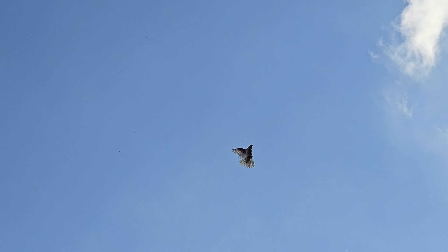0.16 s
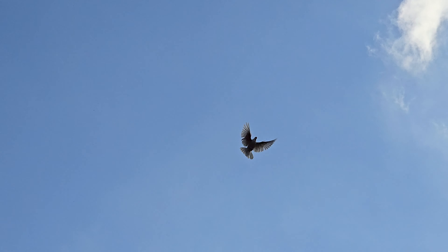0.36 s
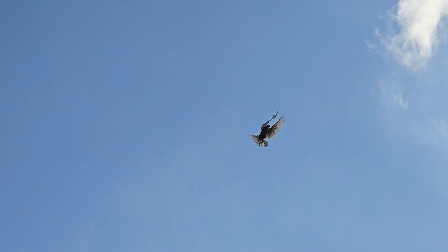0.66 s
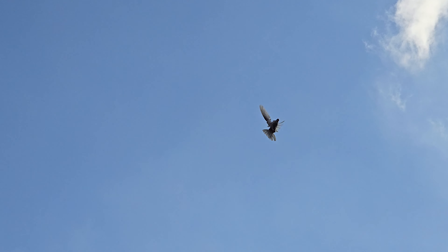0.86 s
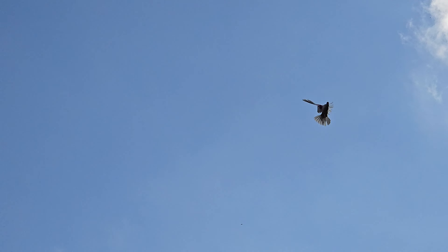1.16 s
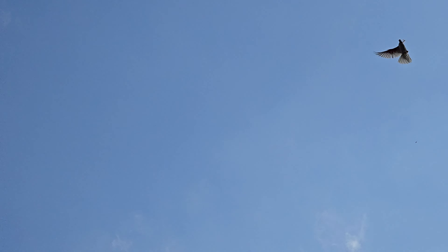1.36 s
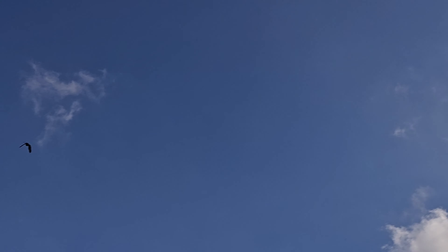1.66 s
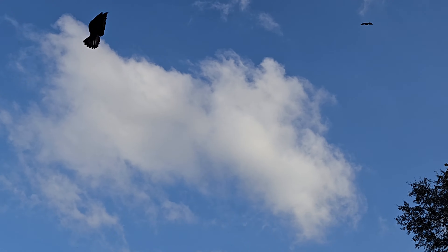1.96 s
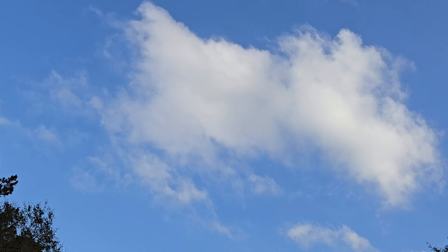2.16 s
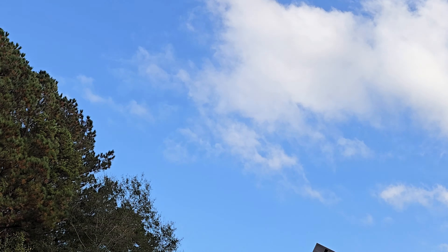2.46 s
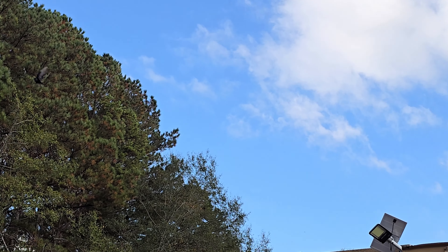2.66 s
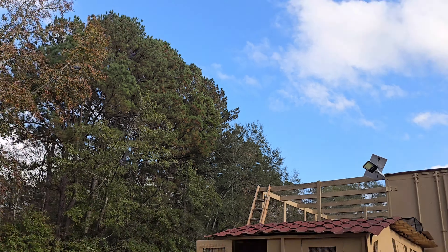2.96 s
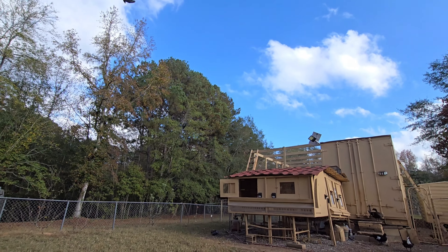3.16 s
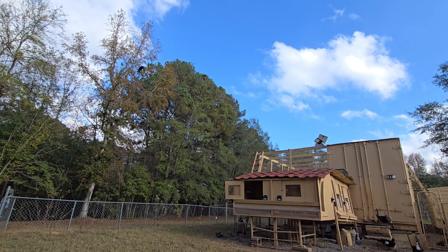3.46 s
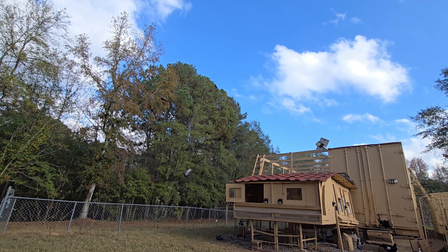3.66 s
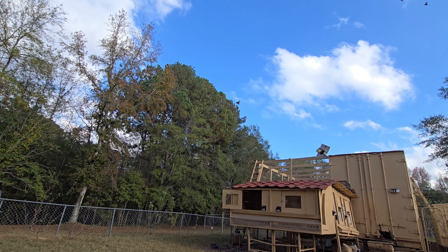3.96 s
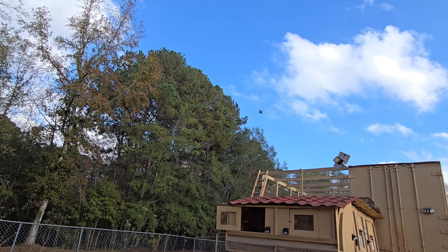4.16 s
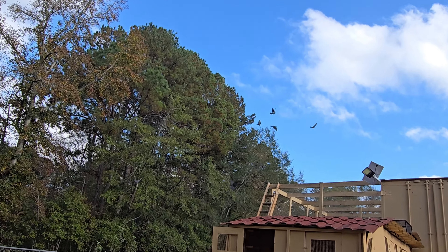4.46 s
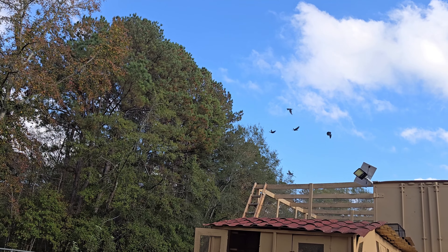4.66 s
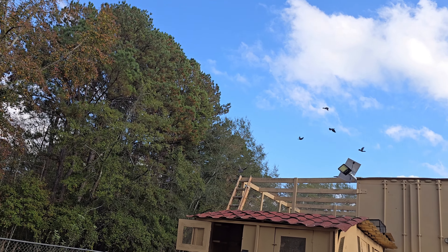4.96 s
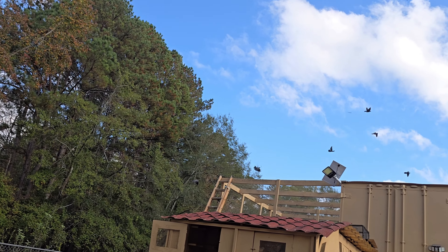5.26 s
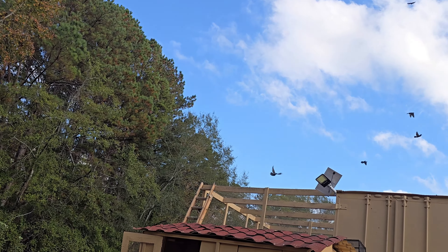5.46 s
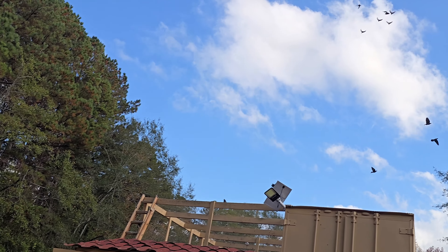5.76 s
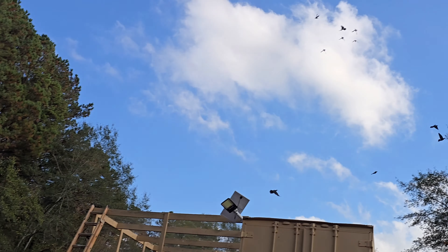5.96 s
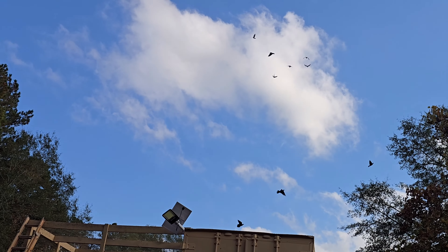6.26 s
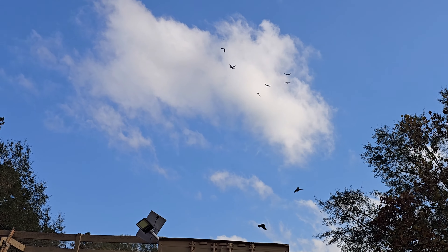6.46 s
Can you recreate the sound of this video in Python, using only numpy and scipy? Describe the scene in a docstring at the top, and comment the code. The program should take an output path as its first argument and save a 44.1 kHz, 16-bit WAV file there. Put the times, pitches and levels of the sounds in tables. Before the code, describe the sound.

Crisp pigeon wing claps outdoors, first single, then a dense close flurry with slapback off a shed wall, thinning into light wind.

```python
"""Pigeons fly over a yard, near a hand-held camera that turns to follow them.
From the start, shaped noise gives light wind, a low roar, feather swish, hiss, a trilling insect and a dragging hand.
Wing claps soon follow: bursts of feather snaps with resonant rings, echoed by the ground and the yard.
Knocks ring the camera body early and again near 1.5 s; then low thuds and a whoosh mark near wings.
Later the shed wall throws the claps back strongly; two ports colour and delay the sound differently."""
import sys
import numpy as np
from scipy import signal
from scipy.fft import rfft, irfft
from scipy.io import wavfile
from scipy.ndimage import uniform_filter1d

SR = 44100
rng = np.random.default_rng(int(sys.argv[2]) if len(sys.argv) > 2 else 0)


def inscribe(sig):
    """Save sig as 16-bit PCM at rate SR to the path in sys.argv[1].

    A 1-D sig is mono; a 2-D sig holds one channel per row.
    Samples are clipped to [-1, 1] before scaling.
    """
    pcm = np.round(np.clip(np.atleast_2d(sig).T, -1, 1) * 32767)
    wavfile.write(sys.argv[1], SR, pcm.astype(np.int16))


N = 291501

# Orientation of the camera to the birds: (time [s], lateness of a clap at the right port [ms],
# gain of quill and cavity rings [dB], left-right level difference of the birds [dB])
FACING = [(0, 0.59, -29, 2), (1.401, 0.53, 0.5, 3.5), (1.9, 0.47, 7.5, 4.5), (2.3, 0.11, 5.5, 0),
          (3.5, 0.12, 8, 4), (5, 0.1, 7.5, 2.5), (5.6, 0.19, 8, 2), (6.61, 0.13, 8.5, 4.5)]
# Swish of feathers through air: (time [s], level [dB])
SWISH_LEVEL = [(0, -52), (1.5, -48.5), (1.66, -55), (1.9, -42.5), (2.65, -50.5), (3.1, -46.5), (3.3, -49.5),
               (4.1, -48), (4.4, -50.5), (5.0, -55), (5.5, -57), (5.7, -61)]


def gain_of(db):
    """Level to amplitude: 20 dB is a factor of ten."""
    return 10 ** (np.asarray(db) / 20)


def evened(x):
    """Normalization of the mean power: rms 1."""
    return x / np.sqrt(np.mean(x ** 2) + 1e-20)


def read(points, hz):
    """Spectral interpolation along a logarithmic frequency axis."""
    f, value = np.transpose(points)
    return np.interp(np.log(hz + 1), np.log(f + 1), value)


def track(points, s):
    """Linear interpolation of (time, value) rows at the times s."""
    return np.interp(s, *np.transpose(points))


def add(mix, s, sound):
    """Superposition: adds a sound to one channel, in place, from time s."""
    part = mix[round(s * SR):][:len(sound)]
    part += sound[:len(part)]


def coloured(x, points):
    """Spectral shaping: multiplies the spectrum of noise by a gain curve, then sets rms 1."""
    hz = np.fft.rfftfreq(x.shape[-1], 1 / SR)
    shaped = rfft(x) * gain_of(read(points, hz))
    return evened(irfft(shaped, x.shape[-1]))


def causal(points):
    """Minimum phase: the Hilbert transform of log gain gives the phase of a causal response."""
    hz = abs(np.fft.fftfreq(4096, 1 / SR))
    log_gain = np.log(gain_of(read(points, hz)))
    return np.fft.ifft(np.exp(np.conj(signal.hilbert(log_gain)))).real[:1024]


def sides(pan_db):
    """Interchannel level difference, split evenly between left and right gains."""
    return gain_of([pan_db / 2, -pan_db / 2])


def rung(x, hz, sharpness):
    """Resonance: a second-order peak driven by x, given the energy of x."""
    ring = signal.lfilter(*signal.iirpeak(hz, sharpness, SR), x)
    return ring * np.linalg.norm(x) / np.linalg.norm(ring)


def slide():
    """Stick-slip friction: skin drags over the shell as grainy noise; a nail adds fine grit."""
    # Drags of the hand: (start [s], length [s], left level [dB], right level [dB], grit relative to rub [dB])
    drags = [(0, 0.062, -53, -53, -6), (0.294, 0.12, -47.5, -48, -12), (0.361, .011, -38.5, -43, -18),
             (1.508, 0.08, -40, -39.5, -11.5), (1.541, 0.019, -30.5, -33.5, 1.5)]
    # Spectrum of the rub: (frequency [Hz], relative density [dB per Hz])
    rub_colour = [(300, 5.5), (1000, 10), (2200, -2.5), (4000, -24), (8000, -9), (9000, -7), (16000, -4)]
    # Spectrum of the fine grit: (frequency [Hz], relative density [dB per Hz])
    grit_colour = [(1500, -1), (3600, -1), (7000, -6), (9000, -23)]
    grip_share, let_go_share = 0.38, 0.22  # of the length: to swell before and fade after, by 20 dB
    t = np.arange(2 * SR) / SR
    roughness = evened(uniform_filter1d(rng.standard_normal(len(t)), size=40))
    grain = gain_of(2.5 * roughness)
    rub = evened(coloured(rng.standard_normal((2, len(t))), rub_colour) * grain)
    grit = evened(coloured(rng.standard_normal((2, len(t))), grit_colour) * grain)
    out = np.zeros((2, len(t)))
    for s, length, left_db, right_db, grit_db in drags:
        before, after = (s - t) / grip_share, (t - s - length) / let_go_share
        away = np.maximum(before, after) / length
        level = gain_of([[left_db], [right_db]] - 20 * np.maximum(away, 0))
        out += level * (rub + gain_of(grit_db) * grit)
    return np.pad(out, [(0, 0), (0, N - len(t))])


def air(colour, level, patchy_db, flicker_db, size, count=4):
    """Diffuse field: partly correlated noise with drifting patches and a flutter shared by all bands."""
    # Left-right correlation of the diffuse field: (frequency [Hz], correlation [-1 to 1])
    likeness = [(60, 0.92), (150, 0.88), (380, 0.8), (950, 0.03), (2380, -0.023), (5980, -0.43),
                (15000, 0.35)]
    frames, hz = 4 * N // size + 5, np.fft.rfftfreq(size, 1 / SR)
    a, b, c, d, patches = rng.standard_normal((frames, len(hz), 5)).T
    patches = uniform_filter1d(patches, size=8, axis=0)
    patches = evened(uniform_filter1d(patches, size=8, axis=1))
    flicker = evened(uniform_filter1d(rng.standard_normal(frames), size=count))
    same = np.clip(read(likeness, hz), -1, 1)[:, None]
    left = a + 1j * b
    right = same * left + np.sqrt(1 - same ** 2) * (c + 1j * d)
    z = np.array([left, right])
    z *= gain_of(read(colour, hz)[:, None] + patchy_db * patches + flicker_db * flicker)
    x = evened(signal.istft(z, nperseg=size, noverlap=3 * size // 4)[1][:, :N])
    return x * gain_of(track(level, np.arange(N) / SR))


def wind():
    """Turbulence: light wind as low-frequency noise of wandering level."""
    # Level of the wind: (time [s], level [dB])
    wind_level = [(0, -44.5), (.75, -42), (1.45, -48.5), (1.66, -45.5), (2.67, -42), (2.8, -53),
                  (4.18, -49.5), (4.34, -55.5), (5.56, -54.5), (5.66, -46.5), (6.61, -48)]
    # Spectrum of the wind: (frequency [Hz], relative density [dB per Hz])
    wind_colour = [(15, -32), (30, -6), (65, -3.5), (110, -8.5), (200, -60)]
    return air(wind_colour, wind_level, patchy_db=1.5, flicker_db=-2.5, size=2048)


def wash():
    """Incoherent summation: a low roar, perhaps far traffic, as diffuse noise."""
    # Level of the roar: (time [s], level [dB])
    wash_level = [(1.47, -49), (1.75, -42), (2.65, -42), (2.8, -45), (3.9, -46), (5.1, -50.5)]
    # Spectrum of the roar: (frequency [Hz], relative density [dB per Hz])
    wash_colour = [(35, -21), (70, -15), (120, 2), (200, 3), (310, -4), (450, -15.5), (750, -8.5),
                   (1260, -13.5), (2000, -24.5), (4000, -48)]
    return air(wash_colour, wash_level, patchy_db=1.5, flicker_db=1.5, size=1024)


def swish():
    """Aerodynamic noise: feathers through air as bright noise that flutters quickly."""
    # Spectrum of the swish: (frequency [Hz], relative density [dB per Hz])
    swish_colour = [(300, -14), (800, 1), (1500, 6.5), (3000, 4), (6000, 0.5), (10000, 6), (16000, 1)]
    return air(swish_colour, SWISH_LEVEL, patchy_db=3.5, flicker_db=4.0, size=256, count=6)


def hiss():
    """Noise floor: shaped random noise at a steady level."""
    hiss_db = -57.5
    # Spectrum of the floor: (frequency [Hz], relative density [dB per Hz])
    hiss_colour = [(500, 8), (2000, 4.5), (5500, -10.5), (7600, -7), (9500, -51), (12000, -19),
                   (14600, 6.5), (16000, -35)]
    return air(hiss_colour, [(0, hiss_db)], patchy_db=1, flicker_db=.5, size=512)


def insect():
    """Amplitude modulation: a far insect trills as throbbing noise through a narrow resonance."""
    hz, width_hz, pulses_per_s, db = 6400, 135, 41.5, -70
    throb = np.cos(np.pi * pulses_per_s * np.arange(N) / SR) ** 2
    pulses = throb * rng.standard_normal((2, N))
    band = signal.lfilter(*signal.iirpeak(hz, hz / width_hz, SR), pulses)
    return gain_of(db) * evened(band)


def passing():
    """Spherical spreading: rows (time [s], level [dB]) falling as 1 / distance from near wings."""
    nearest_s, nearest_db = 1.85, -47.5
    coming_s, going_s = 0.81, 0.34  # time to cover the nearest distance
    s = np.linspace(0, N / SR, num=200)
    off = (s - nearest_s) / np.where(s < nearest_s, coming_s, going_s)
    return np.transpose([s, nearest_db - 10 * np.log10(1 + off ** 2)])


def whoosh():
    """Displacement of air: noise pushed by passing wings, following their distance."""
    # Spectrum of the pushed air: (frequency [Hz], relative density [dB per Hz])
    whoosh_colour = [(180, -27), (290, 12), (400, 14), (520, 1.5), (800, -22), (1300, -16)]
    return air(whoosh_colour, passing(), patchy_db=2.5, flicker_db=2.5, size=1024)


def wings(s, db, envelope, body_db, cup_hz, quill_hz, draw):
    """Forced resonance: uneven feather snaps ring the stiff quills and the air cupped between the wings."""
    # the sharp edge of a stroke at loud_db; harder strokes are brighter
    base_edge_db, edge_per_db, loud_db = 5.5, 0.22, -30.5
    edge_scatter_db, pan_scatter_db = -0.5, 3.5  # from stroke to stroke
    quill_db, quill_q, cup_q = -18, 4.8, 3.5
    puff_db, puff_s = -4, 0.0002  # air squeezed out between the wings, and how quickly
    shared, left, right, grain, chance = draw
    turn, late_ms, facing_db, pan_db = np.transpose(FACING)

    snaps = gain_of(4.0 * evened(uniform_filter1d(grain, size=12)))
    burst = snaps * (shared + 0.69 * np.array([left, right]))
    # however the snaps fall, the stroke keeps its strength
    expected = np.mean(burst ** 2) * np.sum(envelope ** 2)
    actual = np.mean(np.sum((burst * envelope) ** 2, axis=1))
    envelope = envelope * np.sqrt(expected / actual)

    edge_db = base_edge_db + edge_per_db * (db - loud_db) + edge_scatter_db * chance[0]
    crack_colour = [(300, 2.0), (1200, -16.5), (2600, -6.5), (6500, 1.0), (9500, edge_db)]
    crack = coloured(burst, crack_colour) * envelope
    crack = crack * (envelope / envelope.max()) ** 0.31  # narrower in time than the cupped air
    quill_gain = gain_of(quill_db + np.interp(s, turn, facing_db))
    crack = crack + quill_gain * rung(crack, quill_hz, quill_q)

    cup = coloured(burst, [(200, -16.0), (600, -4.5), (2000, -1.0), (4000, -9.0)]) * envelope
    cup = 0.28 * cup + 0.27 * rung(cup, cup_hz, cup_q)
    # a pressure pulse with no net area
    u = np.maximum(np.arange(len(envelope)) - np.argmax(envelope) / 2, 0) / SR / puff_s
    cup = cup - gain_of(puff_db) * u * (2 - u) * np.exp(-u)

    pan = sides(np.interp(s, turn, pan_db) + pan_scatter_db * chance[1])[:, None]
    pair = gain_of(db) * (crack + gain_of(body_db) * cup) * pan
    return (s, pair[0]), (s + np.interp(s, turn, late_ms) / 1000, pair[1])


def flock():
    """Impulsive and gradual excitation: claps start sharply and die away; rustles swell and fade."""
    # Wing claps of a few birds: (time [s], level [dB], drive of cupped air against crack [dB],
    # cupped-air resonance [Hz], quill resonance [Hz])
    claps = [(0.098, -20, -6.5, 2110, 2770.0), (0.559, -21, -10.5, 1330, 2440.0),
             (0.7523, -18, -9, 1990, 3800.0), (0.8883, -25, -3.5, 533, 5400.0),
             (1.0289, -27, -5, 929, 5010.0), (1.1637, -20.5, -10.5, 1850, 2490.0),
             (1.2977, -21.5, -8.5, 1430, 5090.0), (1.4247, -22.5, -9, 1910, 3600),
             (1.619, -25.5, -18, 2030, 3400), (1.691, -28.5, -8, 673, 3570), (1.807, -34, -15, 700, 2210.0),
             (1.8216, -29, -16, 743, 5100), (1.8521, -24.5, 4, 646, 4290.0), (1.9461, -26.5, 3, 960, 3130),
             (2.0885, -21.5, -4, 875, 3860), (2.1922, -26.5, -4, 780, 2960),
             (2.2098, -24.5, 4.5, 820, 4250), (2.2549, -29, 2, 680, 4210.0),
             (2.2978, -24, -1, 1440, 2820.0), (2.4016, -23.5, 8, 930, 3700),
             (2.4514, -29, -0.5, 750, 3540.0), (2.503, -29.5, 9, 750, 3690.0),
             (2.6041, -18, -1.5, 1480, 4050), (2.6858, -13, -4, 750, 3320), (2.7108, -25, 3, 800, 4600),
             (2.7174, -22.5, 0.5, 1700, 3900), (2.7403, -24.5, 6, 820, 3050.0),
             (2.8189, -21, -0.5, 684, 3400), (2.881, -20, -6, 700, 4100), (2.926, -28.5, -3.5, 606, 3030.0),
             (2.956, -30, -7, 960, 3870), (2.9939, -35.5, 10.5, 970, 2280), (3.0206, -26, 1, 720, 4240),
             (3.033, -30, -7, 720, 4160), (3.1433, -27, -3.5, 695, 4260), (3.259, -20.5, -3.5, 710, 4670),
             (3.3749, -29, -14, 1600, 4300), (3.396, -37, 11.5, 860, 4150), (3.504, -35, 11, 740, 3500),
             (3.6166, -21, -2.5, 670, 3960), (3.7332, -22, 0, 640, 4460), (3.841, -26, 0, 720, 3300),
             (3.854, -35, -1, 700, 3880.0), (4.074, -25, -1, 740, 3570), (4.119, -29, 1, 766, 4200),
             (4.136, -22.5, -9, 680, 3460), (4.194, -19, -11, 657, 3780), (4.316, -26.5, -8, 754, 3550),
             (4.34, -23, -2, 1190, 4330), (4.4349, -26, -2.5, 775, 3630), (4.4553, -27, -1, 1280, 4100),
             (4.556, -32, 7, 700, 3560), (4.5652, -15, -6.5, 1270, 4500), (4.6829, -17.5, -6, 1200, 4070),
             (4.803, -26.5, 3, 705, 3770), (4.918, -26.5, -6, 810, 4060), (4.929, -34, -6, 800, 3940),
             (4.998, -39.5, -1, 800, 4000), (5.036, -24, -5, 1340, 3770), (5.068, -37, -7, 900, 3280.0),
             (5.1605, -23.5, -1.5, 1260, 3380), (5.2882, -21.5, -5, 1300, 4300),
             (5.415, -33.5, 1.5, 910, 3970.0), (5.5387, -24, -8.5, 1090, 4000),
             (6.1501, -41, 10, 1180, 3900), (6.423, -31, -2.5, 720, 4100), (6.571, -40.5, -5, 636, 4250)]
    # Feathers rustling through a stroke: (time [s], level [dB],
    # drive of cupped air against crack [dB], length [s])
    rustles = [(0.606, -41, -11, 0.059), (0.813, -36.5, -10, 0.053), (1.094, -35, -2, 0.04),
               (1.734, -29.5, 3, 0.014), (1.8768, -23.5, -6.5, 0.035), (1.982, -37, 6, 0.049),
               (2.08, -30.5, 5, 0.027), (3.065, -40, 4.5, 0.042), (3.089, -37.5, -15, 0.023),
               (4.091, -31.5, -2, 0.011), (4.718, -35, 1, 0.013)]
    faint_per_s, faint_db = 18, 5  # far birds' claps: mean number, and level above the swish
    out, t = np.zeros((2, N)), np.arange(2048) / SR
    strike = (1 - np.exp(-t / 0.00085)) ** 2 * gain_of(3.0 - 60 * t / 0.02)
    when = rng.random(round(faint_per_s * N / SR)) * N / SR + .01
    faint = [(s, faint_db + track(SWISH_LEVEL, s), -6, 800, 3900) for s in when]
    strokes = claps + faint
    for (s, db, *colour), draw in zip(strokes, rng.standard_normal((len(strokes), 5, len(t)))):
        # the onset leads the tabled time
        for side, sound in zip(out, wings(s - .0007, db, strike, *colour, draw)):
            add(side, *sound)
    for (s, db, body_db, length), draw in zip(rustles, rng.standard_normal((len(rustles), 5, len(t)))):
        swell = np.sin(np.pi * np.clip(t / length, 0, 1) ** 0.332) ** 2
        for side, sound in zip(out, wings(s - .0012, db, swell, body_db, 780, 3580, draw)):
            add(side, *sound)
    return out


def slaps(x):
    """Diffuse reflection: ground and shed wall each return the claps once, smeared by rough faces."""
    # Slap off the shed wall, strong once the birds circle near it: (time [s], level [dB])
    shed_level = [(2.4, -24), (2.8, -13.5), (3.7, -15.5), (4.7, -14.5), (5.4, -15)]
    ground_delay_s, ground_db, shed_delay_s = 0.0069, -20, 0.031
    t = np.arange(1500) / SR
    t60_s = np.reshape([.012, .05], (2, 1, 1))  # ground, shed
    smear = rng.standard_normal((2, 2, len(t))) * gain_of(-60 * t / t60_s)
    ground, shed = (signal.oaconvolve(x, face / np.linalg.norm(face[0]), axes=1) for face in smear)

    def late(sound, s):
        """Propagation delay: shifts a sound by s seconds."""
        return np.pad(sound, [(0, 0), (round(s * SR), 0)])[:, :N]

    near = gain_of(track(shed_level, np.arange(N) / SR))
    return gain_of(ground_db) * late(ground, ground_delay_s) + near * late(shed, shed_delay_s)


def yard(x):
    """Reverberation: scattered echoes from ground, sheds and trees decay at a rate set by frequency."""
    # Decay of the yard: (frequency [Hz], time to fall 60 dB [s])
    yard_t60 = [(300, 0.063), (2000, 0.19), (6000, 0.62), (14000, 0.16)]
    yard_db = -16.5
    taps = np.zeros((2, SR // 2))
    # one echo of random sign in every 20 samples
    at = np.arange(300, SR // 2 - 20, 20) + rng.integers(0, 20, (2, (SR // 2 - 301) // 20))
    np.put_along_axis(taps, at, rng.choice([-1., 1.], at.shape), 1)
    hz, t, z = signal.stft(taps, SR, nperseg=256)
    decay = gain_of(-60 * t / read(yard_t60, hz)[:, None])
    tail = signal.istft(z * decay, SR, nperseg=256)[1]
    tail = tail / np.linalg.norm(tail[0])
    return gain_of(yard_db) * signal.fftconvolve(x, tail, axes=1)[:, :N]


def knocks():
    """Modal excitation: each crack rings panels near its pitch and the shell, and jolts the whole camera."""
    # Knocks on the camera: (time [s], left crack level [dB], right crack level [dB], crack pitch [Hz],
    # clean push against grit [ratio], shell ring level [dB], jolt level [dB])
    hits = [(.3055, -66, -28, 2730, 0.6, -63, -50), (.316, -54, -37, 2430, .5, -62.5, -47),
            (0.345, -53, -31, 2120, .5, -31, -40), (0.3621, -32, -19, 1400, 0.69, -24.5, -32),
            (0.3675, -30, -12, 1250, 2.8, -49, -60), (1.4690, -14.5, -40, 2830, .1, -53, -62),
            (1.5349, -7, -20, 4330, 0.63, -60, -60), (1.5362, -0.5, -30, 8460, 1.25, -60, -60),
            (1.5356, -4, -7, 2320, 0.77, -4.5, -21), (1.5488, -29, -17, 2780, 0.73, -40, -60),
            (1.5592, -1.5, -27, 1100, 5.3, -14, -48), (1.5591, -20, -14.5, 3700, .5, -60, -60),
            (1.5665, -36, -20, 3480, 0.61, -6, -10.5), (1.5858, -28, -15, 1050, 1.7, -24, -19)]
    # Modes of the camera body: (frequency [Hz], level against the crack before its colour [dB],
    # time to fall 60 dB [s])
    panel_modes = [(1250, -20, .004), (2256, -10, .011), (3359, -8, .008), (4500, -7, .008),
                   (6700, -14, .006)]
    jolt_hz, jolt_t60_s = 62, 0.095
    shell_hz, shell_t60_s, shell_left_db, shell_delay_s = 440, 0.026, -15.5, 0.0005  # mostly right
    right_late_s, jolt_late_s = .0009, 0.0021  # at the right port; the jolt's adds to the knock's
    crack_t60_s, rise_cycles = 0.0029, 0.45  # a crack swells over part of its first cycle
    out, t = np.zeros((2, N)), np.arange(6000) / SR
    draws = rng.standard_normal((len(hits), 2, len(t)))
    lag = np.maximum(t - [[0], [jolt_late_s]], 0)
    jolt = gain_of(-60 * lag / jolt_t60_s) * np.sin(2 * np.pi * jolt_hz * lag)
    jolt = jolt * sides(4.0)[:, None]
    after = np.maximum(t - shell_delay_s, 0)
    ring = gain_of(-60 * after / shell_t60_s) * np.sin(2 * np.pi * shell_hz * after)
    ring = ring * gain_of([[shell_left_db], [0]])
    for (s, left_db, right_db, hz, push, ring_db, jolt_db), noise in zip(hits, draws):
        colour = [(hz / 4, -20), (hz, 0), (hz * 4, -22)]
        crack = coloured(noise, colour) - push * np.sin(2 * np.pi * hz * t)
        crack = crack * gain_of(-60 * t / crack_t60_s)
        panels = sum(gain_of(db + read(colour, f) - 60 * t / t60) * np.sin(2 * np.pi * f * t)
                     for f, db, t60 in panel_modes)
        rise = (1 - np.exp(-t * hz / rise_cycles)) ** 2
        crack = (crack - panels) * rise * gain_of([[left_db], [right_db]])
        knock = crack + gain_of(ring_db) * ring + gain_of(jolt_db) * jolt
        for side, late_s, sound in zip(out, (0, right_late_s), knock):
            add(side, s + late_s, sound)
    return out


def thuds():
    """Near-field pressure: downstrokes give a few cycles of low air, alike at both ports."""
    # Soft thuds of near downstrokes: (time [s], peak level [dB], frequency [Hz])
    downstrokes = [(1.712, -37, 291), (1.794, -33, 293), (2.112, -40, 283), (2.298, -31.5, 267),
                   (2.4, -39, 188), (2.517, -33.5, 242), (2.633, -33, 255), (2.707, -35.5, 298)]
    cycles = 6.6
    out = np.zeros(N)
    for s, db, hz in downstrokes:
        turns = np.arange(0, cycles, hz / SR)
        swell = np.sin(np.pi * (turns / cycles) ** 0.7) ** 2
        add(out, s - .004, gain_of(db) * swell * np.sin(2 * np.pi * turns))
    return out


def scene():
    """Linear superposition: claps, echoes and the hand over wind, roar, wing air, insect and floor."""
    backdrop = wind() + wash() + swish() + hiss() + insect()
    birds = flock()
    echoes = slaps(birds) + yard(birds)
    return slide() + backdrop + whoosh() + birds + echoes + knocks() + thuds()


def record(dry):
    """Linear filtering: port colours, a right cavity resonance that follows the facing, a band limit."""
    # Response of the left port: (frequency [Hz], gain [dB])
    left_port = [(200, -2.5), (1000, -1), (2100, -1.5), (3500, -1.5), (4500, -1.5), (7800, -3), (9000, -13),
                 (11300, -15), (12500, -10.5), (15600, -12), (16100, -32)]
    # Response of the right port: (frequency [Hz], gain [dB])
    right_port = [(200, -2.5), (1000, -1), (2000, -1), (3500, 1.5), (5000, -5.5), (6000, -15), (7300, -8.5),
                  (9000, -24.5), (11000, -23.5), (11700, -8), (15600, -5), (16100, -38.5)]
    cavity_hz, cavity_width_hz, edge_hz = 3900, 710, 16900
    left = signal.oaconvolve(dry[0], causal(left_port))[:N]
    right = signal.oaconvolve(dry[1], causal(right_port))[:N]
    turn, _, cavity_db, _ = np.transpose(FACING)
    ringing = signal.lfilter(*signal.iirpeak(cavity_hz, cavity_hz / cavity_width_hz, SR), right)
    right = right + gain_of(np.interp(np.arange(N) / SR, turn, cavity_db)) * ringing
    edge = signal.firwin(511, edge_hz, window=("kaiser", 9), fs=SR)
    return signal.oaconvolve(np.array([left, right]), edge[None], "same")


dry = scene()
out = record(dry)
inscribe(out)
```